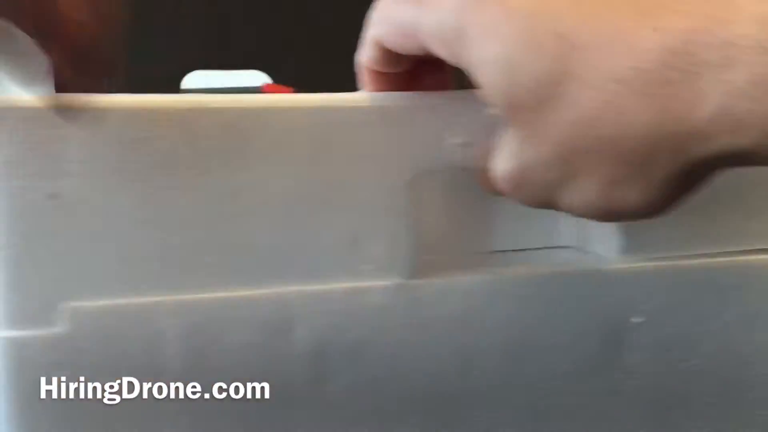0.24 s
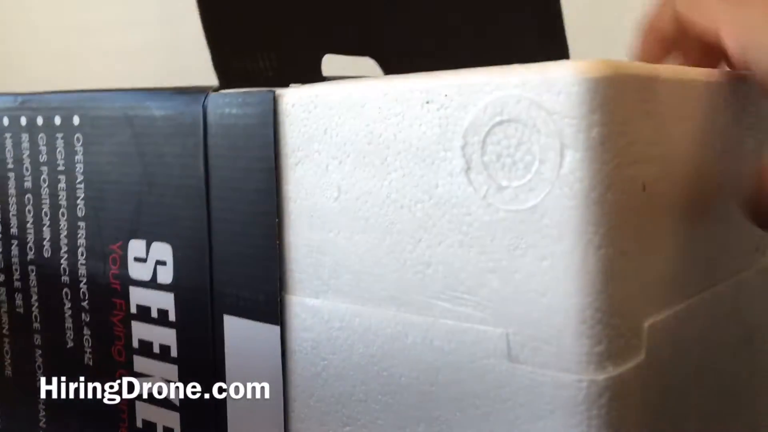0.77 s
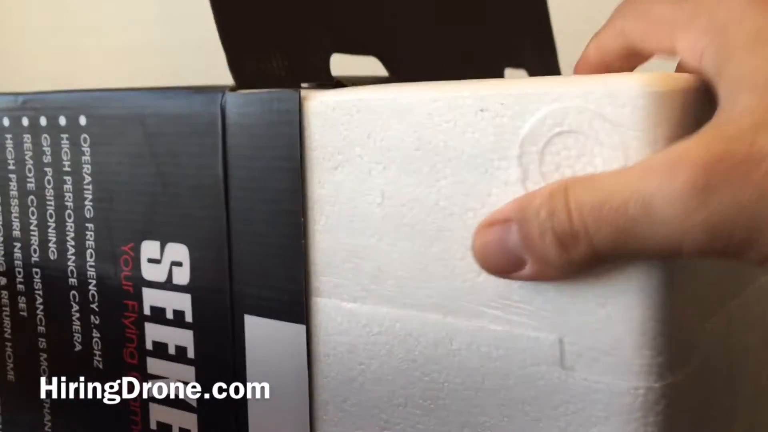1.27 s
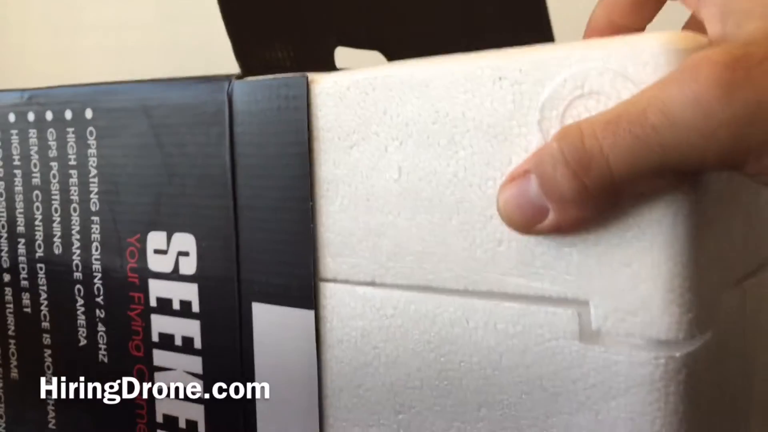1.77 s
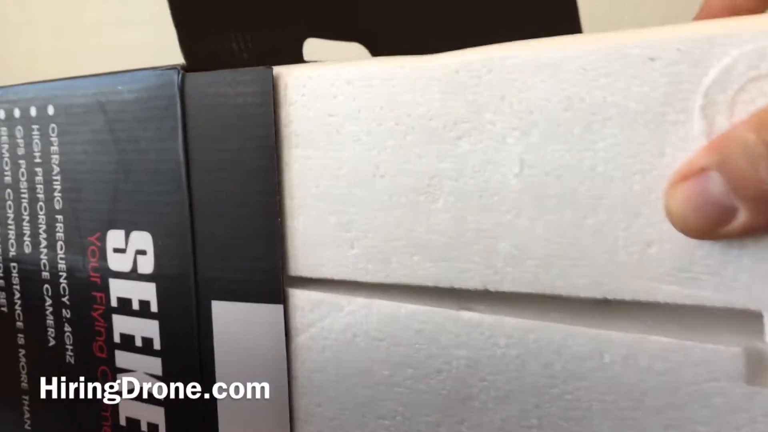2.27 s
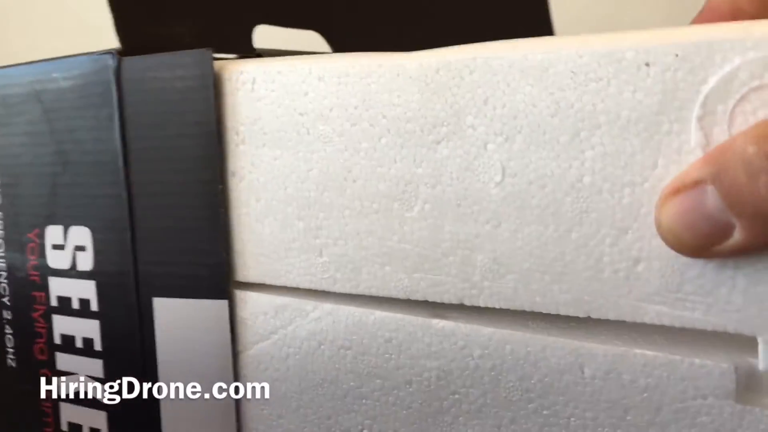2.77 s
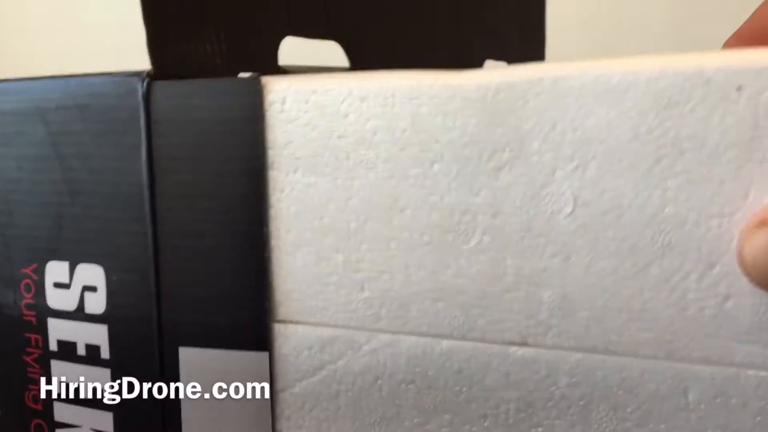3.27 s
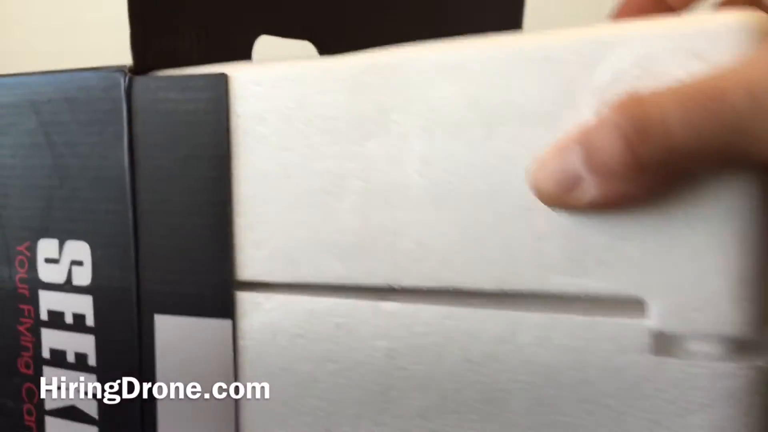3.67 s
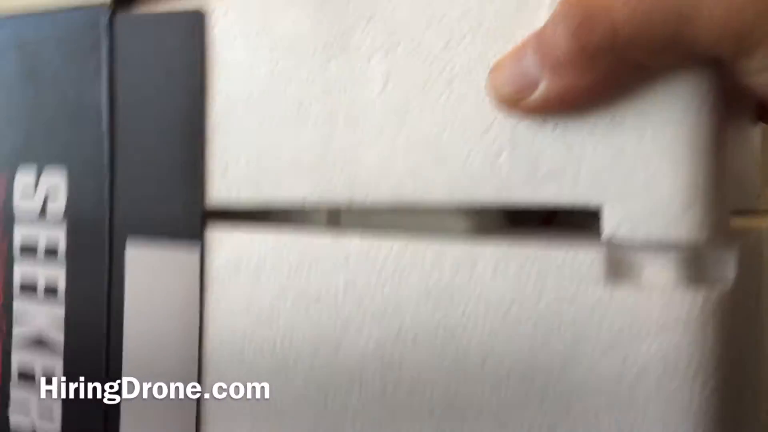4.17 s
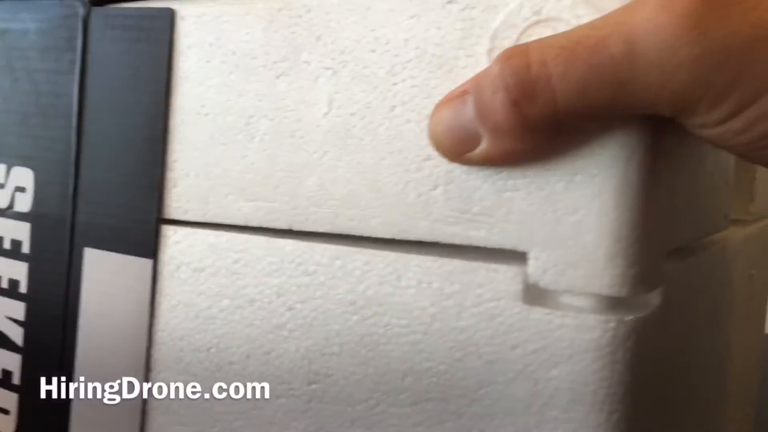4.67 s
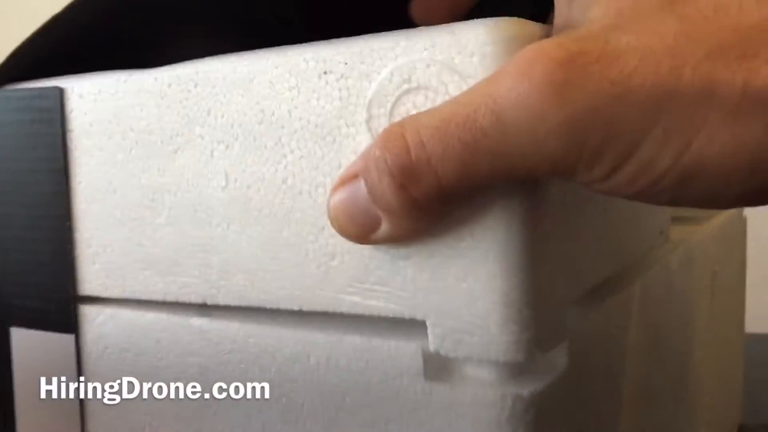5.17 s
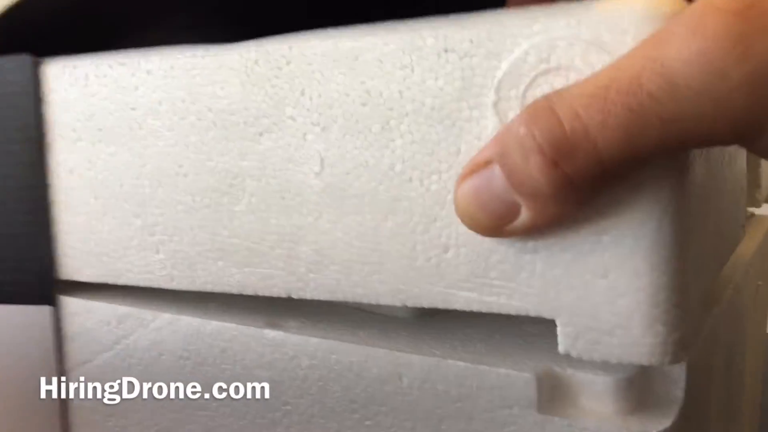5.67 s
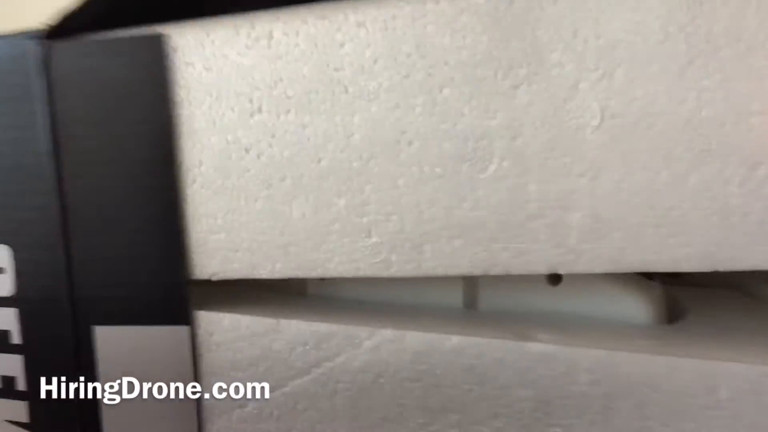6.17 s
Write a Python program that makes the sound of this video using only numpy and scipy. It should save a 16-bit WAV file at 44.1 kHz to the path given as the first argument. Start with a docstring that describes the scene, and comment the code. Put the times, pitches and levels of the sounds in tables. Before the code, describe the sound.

Close foam rasps and hisses against card in short jerky drags, with brief squeaks, bright ticks and dull box thumps growing stronger at the end.

```python
"""A small room, one microphone close to a cardboard box as a polystyrene insert is worked out in uneven pulls.
Foam beads slip over the card: dense random trains of slips make the hiss and rasp, and others shake the panels.
The foam catches in rough noise bursts, squeaks in gliding tones and ticks in short rings.
The block knocks on the hollow box: juddering pushes excite the modes and flexing of the card."""
import sys
import numpy as np
from scipy import signal
from scipy.fft import rfft, irfft
from scipy.io import wavfile

SR = 44100
rng = np.random.default_rng(int(sys.argv[2]) if len(sys.argv) > 2 else 0)


def unload_wav(signal):
    """Save mono or channel-first audio to the path in sys.argv[1] as 16-bit WAV at rate SR, clipped to [-1, 1]."""
    wavfile.write(
        sys.argv[1],
        SR,
        np.round(np.clip(np.atleast_2d(signal).T, -1, 1) * 32767).astype(np.int16),
    )


N = 283562
TIME = np.arange(N) / SR  # seconds


def undb(db):
    """Decibels to amplitude gain."""
    return 10 ** (np.asarray(db) / 20)


def unit(x):
    """Scale to rms 1."""
    return x / np.sqrt(np.mean(x ** 2) + 1e-18)


def add(out, s, x):
    """Mix x into out from s seconds."""
    i = max(int(s * SR), 0)
    out[i:i + len(x)] += x[:max(N - i, 0)]


def curves(rows):
    """Each column of a table joined by straight lines in time."""
    s, *columns = np.transpose(rows)
    return [np.interp(TIME, s, c) for c in columns]


def walk(rate, size=N):
    """Chance wandering with spread near 1: random points, rate per second, joined by straight lines."""
    steps = np.arange(size) * rate / SR
    points = rng.standard_normal(size // 4)
    return 1.2 * np.interp(steps, np.arange(size // 4), points)


def colour(x, points, order=8192):
    """Causal minimum-phase filter with the given (Hz, dB) outline, made by folding its cepstrum."""
    hz, db = np.transpose(points)
    grid = np.maximum(np.arange(order // 2 + 1) * SR / order, 1)
    outline_db = np.interp(np.log(grid), np.log(hz), db)
    cepstrum = irfft(np.log(undb(outline_db)))
    cepstrum[1:order // 2] *= 2
    cepstrum[order // 2 + 1:] = 0
    response = irfft(np.exp(rfft(cepstrum)))
    return signal.fftconvolve(x, response)[:len(x)]


def resonate(x, hz, q):
    """One resonance, gain 1 at its centre; the centre and narrowness are limited for high pitches."""
    hz = min(hz, SR / 3)
    return signal.lfilter(*signal.iirpeak(hz, max(q, 3 * hz / SR), fs=SR), x)


def slips(rate, spread_db):
    """A random train of tiny slips of very unequal size, rate per second on average."""
    happens = rng.random(N) < rate / SR
    size_db = spread_db * np.minimum(rng.exponential(size=N), 5)
    return unit(happens * rng.standard_normal(N) * undb(size_db))


def sing(x, share=2.66, q=20, life=0.03, count=420):
    """Patches of foam ring for life seconds, each at a pitch of its own, as the contact wanders."""
    out, swell = x.copy(), np.hanning(int(life * SR))
    for when, pitch, size in rng.random((count, 3)):
        s = when * (N - len(swell)) / SR
        patch_hz = 2200 * 6.4 ** pitch
        patch = resonate(x[int(s * SR):][:len(swell)], patch_hz, q)
        add(out, s, share * size * patch * swell)
    return unit(out)


def friction():
    """Hiss and rasp levels in dB: both follow each pull's sliding speed, and a quieter slide jerks more."""
    # The pulls of the hand. Each row: start in seconds, rise to full speed in seconds, steady slide in
    # seconds, time constant of the stall in seconds, then bead hiss and coarse rasp at full speed,
    # both in dB before jerks and trims.
    pulls = [(0, 0.004, 0.014, 0.19, -39, -39), (0.266, 0.094, .32, .035, -36.5, -48.5),
             (0.749, 0.02, 0.041, 0.036, -42.5, -49), (1.05, .008, 0.072, 0.032, -37, -42.5),
             (1.16, 0.043, 0.024, 0.1, -32.5, -40), (1.29, .13, 0.024, 0.035, -32, -38),
             (1.514, 0.096, 0.012, 0.085, -36, -38.5), (1.75, 0.045, 0.061, 0.029, -38.5, -49),
             (1.925, 0.022, 0.034, 0.035, -34, -38), (1.95, 0.08, 0.053, 0.11, -20.5, -35.5),
             (2.1, 0.15, .08, .14, -34, -36.5), (2.48, 0.018, .006, 0.0069, -37, -38.5),
             (2.525, 0.036, 0.04, 0.1, -46, -46.5), (2.693, 0.023, 0.083, 0.019, -35.5, -35.5),
             (2.841, 0.067, 0.042, 0.03, -25.5, -34.5), (2.99, 0.17, .008, 0.034, -32, -32),
             (3.34, .025, 0.098, 0.034, -61, -53), (3.449, 0.039, 0.037, .018, -35, -38),
             (3.535, 0.051, 0.13, 0.04, -32, -36.5), (3.82, 0.059, 0.016, 0.021, -39, -42),
             (3.975, 0.018, 0.022, 0.052, -55, -53), (4.114, .125, .006, 0.041, -36.5, -37.5),
             (4.27, .04, .03, 0.027, -41, -46.5), (4.345, 0.057, 0.006, 0.025, -28.5, -38.5),
             (4.455, 0.046, .004, 0.011, -32, -37.5), (4.52, 0.052, .006, 0.023, -31, -39.5),
             (4.6, .02, 0.061, 0.037, -44, -45.5), (4.779, 0.0063, 0.052, 0.037, -40, -48),
             (4.92, 0.12, .07, 0.033, -39, -48), (5.128, 0.026, 0.015, 0.067, -27.5, -38.5),
             (5.23, 0.11, .018, .045, -28.5, -38.5), (5.375, 0.063, .18, .065, -25, -33),
             (5.655, 0.052, 0.016, 0.072, -24.5, -35), (5.755, 0.08, 0.069, 0.017, -24, -31.5),
             (5.942, 0.039, 0.045, .018, -20.5, -30.5), (6.053, 0.019, .01, 0.024, -24.5, -26),
             (6.12, 0.052, 0.054, 0.033, -25, -32), (6.354, 0.1, .01, .03, -23, -33)]
    rise_power = 0.96  # 1 is a steady acceleration
    rasp_power = 0.65  # hiss grows in step with the speed, rasp with this power of it
    creep_hiss_db, creep_rasp_db = -57.5, -66  # the gripped foam never lies quite still
    jerk_depth_db, jerk_hz = 2.15, 55.3
    jerky_below_db, smooth_above_db = -47.5, -28  # hiss levels
    hiss_power, rasp_power_sum = undb(creep_hiss_db) ** 2, undb(creep_rasp_db) ** 2
    for start, rise, slide, stall, hiss_db, rasp_db in pulls:
        t = TIME - start
        speeding_up = np.clip(t / rise, 0, 1) ** rise_power
        stalling = np.exp(-np.clip((t - rise - slide) / stall, 0, 20))
        speed = speeding_up * stalling
        hiss_power = hiss_power + (undb(hiss_db) * speed) ** 2
        rasp_power_sum = rasp_power_sum + (undb(rasp_db) * speed ** rasp_power) ** 2
    hiss_db, rasp_db = 10 * np.log10(hiss_power), 10 * np.log10(rasp_power_sum)
    jerkiness = np.interp(hiss_db, [jerky_below_db, smooth_above_db], [1, 0])
    jerk_db = jerk_depth_db * jerkiness * walk(jerk_hz)
    return hiss_db + jerk_db, rasp_db + jerk_db


def scrape(hiss_db, rasp_db):
    """Beads slip over the card; the grip flutters and moves the fine hiss and the coarse rasp together."""
    # Colours of the fine hiss and the coarse rasp. Each row: frequency in Hz, relative level in dB.
    hiss_outline = [(1500, -45.5), (3000, -6.5), (4300, -13.5), (4900, -6), (6500, -5.5), (8500, -4),
                    (10700, -0.5), (13000, 0.5), (15500, -2.5)]
    rasp_outline = [(500, -2.5), (1100, 2), (1700, 0.5), (2300, 2.5), (3300, 0), (3900, -3), (5500, -1),
                    (7000, -2), (9500, -7.5), (15000, -20.5)]
    grip_db = 0.53 * walk(45) + 0.23 * walk(420)
    hiss = unit(colour(sing(slips(rate=26000, spread_db=-0.5)), hiss_outline))
    rasp = unit(colour(sing(slips(rate=8000, spread_db=-1.3)), rasp_outline))
    # a stronger pull makes shorter slips, so the top grows faster than the rest
    top = signal.sosfilt(signal.butter(1, 11000, "high", fs=SR, output="sos"), hiss)
    tilt_db = 0.11 * (hiss_db + 30)
    hiss = (hiss - top) * undb(-tilt_db) + top * undb(tilt_db)
    return undb(grip_db) * (undb(hiss_db + 1.05) * hiss + undb(rasp_db - 0.27) * rasp)


def crackle(hiss_db, rate=130, db=-13, hz=5200, spread_db=5.5):
    """Among the slips whole beads snag and let go with a sharper snap; the level follows the hiss."""
    t = np.arange(SR // 200) / SR  # 5 ms
    snap = rng.standard_normal(len(t)) * np.exp(-t / 0.003)
    snaps = signal.fftconvolve(slips(rate, spread_db), snap)[:N]
    return undb(hiss_db + db) * unit(resonate(snaps, hz, 0.3))


def box_response(flex_t60=0.054, flex_db=-4, slap_db=-6, size=16384):
    """A blow on the box: direct slap, a few clear modes and dense, quickly damped flexing of the card."""
    # Modes of the box with the foam in it. Each row: frequency in Hz, relative level in dB,
    # time to fall by 60 dB in seconds.
    box_modes = [(82.3, -4, 0.077), (129, -15, 0.19), (150, -4.5, 0.055), (188, -5.5, 0.17),
                 (240, -3.5, 0.18), (303.6, -2.5, 0.12), (357, -17, 0.21), (483.5, 9, 0.043),
                 (599, -2.5, 0.097), (639.6, -4.5, 0.15), (803, -8.5, 0.2), (924, 3, 0.081),
                 (1280, -8, 0.019), (1450, 1, 0.017), (2160, -5.5, 0.041), (2140, -8, 0.012)]
    # Colour of the slap and the flexing card. Each row: frequency in Hz, relative level in dB.
    flex_outline = [(25, 7.5), (75, -4.5), (200, 3), (400, 7), (650, 1.5), (1000, 5.5), (1500, -9.5),
                    (3000, -8), (8000, -29), (15000, -58)]
    t = np.arange(size) / SR
    slap = colour(1. * (t == 0), flex_outline)
    modes = np.zeros(size)
    for k, (hz, db, t60) in enumerate(box_modes):
        sign = (-1) ** k
        modes += sign * undb(db - 60 * t / t60) * np.sin(2 * np.pi * hz * t)
    flex = colour(rng.standard_normal(size) * undb(-60 * t / flex_t60), flex_outline)
    ring = undb(slap_db) * unit(slap) + unit(modes) + undb(flex_db) * unit(flex)
    return ring / np.sqrt(np.sum(ring ** 2))  # unit energy


def panels(box, rasp_db):
    """The dragging shakes the card panels and the hollow of the box, both growing with the rasp."""
    # How the box takes up the sliding. Each row: time in seconds, panel level and hollow rumble level,
    # both in dB at a moderate rasp, before a trim.
    shake = [(0, -49, -65), (.2, -43.5, -65), (.55, -41, -51), (.72, -45, -62), (1, -48, -60.5),
             (1.28, -40.5, -56), (1.8, -42, -58), (2.3, -45, -58), (2.65, -44, -46), (2.9, -44.5, -52),
             (3.42, -48.5, -50.5), (3.7, -41, -57), (4.05, -47.5, -53.5), (4.45, -43, -48.5),
             (4.7, -39.5, -52), (4.9, -38.5, -42), (5.3, -44, -47), (6.43, -43, -47.5)]
    # Colours of panels and rumble. Each row: frequency in Hz, relative level in dB.
    panel_outline = [(130, -27), (260, 1.5), (380, -2), (500, 3), (680, 4.5), (950, 1), (1250, -6),
                     (2000, -19.5), (5000, -37)]
    rumble_outline = [(25, -4.5), (50, -21), (80, -1), (125, -2), (190, 0.5), (260, -1), (400, -12),
                      (900, -35)]
    moderate_rasp_db = -40
    panel_growth, rumble_growth = 0.59, 0.13  # dB per dB of rasp
    panel_db, rumble_db = curves(shake)
    drive_db = rasp_db - moderate_rasp_db
    drag = slips(rate=3000, spread_db=-1.5)
    ring = signal.fftconvolve(rng.standard_normal(N), box)[:N]
    drone = unit(colour(drag + 0.014 * ring, panel_outline))
    rumble = unit(colour(slips(rate=970, spread_db=3.5), rumble_outline))
    drone_gain = undb(panel_db + panel_growth * drive_db + 0.6)
    rumble_gain = undb(rumble_db + rumble_growth * drive_db + 0.8)
    return drone * drone_gain + rumble * rumble_gain


def quiet_air():
    """The quiet air of the room: steady coloured noise."""
    # Colour of the air. Each row: frequency in Hz, relative level in dB.
    air_outline = [(25, 13), (60, 11.5), (200, 10), (600, 12), (1500, -6), (4000, -20), (8000, -66),
                   (12000, -4), (15500, -9)]
    return undb(-54.0) * unit(colour(rng.standard_normal(N), air_outline))


def squeaks(overtone_db=-8, uneven=0.32, flutter_db=3, size=8192):
    """Stick-slip squeaks and low creaks: slips lock into a gliding, scattering cycle, strong and weak in turn."""
    # Each row: start in seconds, length in seconds, start and end pitch in Hz,
    # level in dB before flutter and fades, pitch scatter as a share of the pitch.
    squeak_rows = [(.002, 0.052, 1555, 1410, -37, 0.14), (.05, .015, 1350, 1290, -33, .03),
                   (0.438, 0.046, 330, 279, -44, .06), (0.543, 0.024, 910, 1086, -39.5, .1),
                   (0.559, 0.033, 1357, 1200, -40, 0.026), (1.27, 0.039, 409, 353, -38, 0.066),
                   (1.558, 0.019, 3240, 3480, -30, 0.05), (3.212, 0.087, 565, 261, -46.5, 0.052),
                   (3.404, 0.11, 269, 659, -46, 0.071), (3.508, 0.035, 584, 645, -40.5, 0.033),
                   (3.63, 0.046, 502, 556, -42, .04), (3.719, 0.086, 464, 227, -46, 0.076),
                   (3.914, .012, 2690, 3100, -42, 0.045), (3.916, 0.0069, 5280, 6040, -31, 0.018),
                   (4.571, 0.011, 8500, 9300, -25, 0.047), (5.713, 0.03, 5200, 8860, -26, 0.045),
                   (5.707, 0.06, 14000, 11930, -24.5, 0.064), (6.311, 0.021, 3370, 3440, -38, 0.106),
                   (6.399, 0.014, 6900, 6460, -37, 0.046), (6.412, 0.025, 5750, 5400, -27, 0.036)]
    out = np.zeros(N)
    for s, length, start_hz, end_hz, db, scatter in squeak_rows:
        u = np.minimum(np.arange(size) / SR / length, 1)
        glide_hz = start_hz + (end_hz - start_hz) * u
        hz = glide_hz * (1 + scatter * walk(min(start_hz / 4, 4000), size))
        phase = 2 * np.pi * np.cumsum(hz) / SR
        # the 3/2 partial makes every second slip differ
        partials = [(1, 1), (3 / 2, uneven * undb(overtone_db / 2)),
                    (2, undb(overtone_db)), (3, undb(2 * overtone_db))]
        tone = sum(gain * np.sin(k * phase) * (k * hz < SR / 2) for k, gain in partials)
        flutter = undb(db + flutter_db * walk(428, size))
        swell = np.abs(np.sin(np.pi * u)) ** 0.5
        add(out, s, flutter * unit(tone) * swell)
    return out


def catches(q=1.7):
    """Foam tears free or is brushed by the hand: a patch of beads in a rough burst, quick to start, dying away."""
    # Each row: start in seconds, length in seconds, level in dB before the swell, centre in Hz.
    catch_rows = [(.005, 0.18, -39.5, 6100), (0.347, 0.46, -42, 5800), (0.352, .04, -45, 4200),
                  (1.18, 0.057, -36, 7500), (2.98, 0.011, -47, 8000), (3.169, 0.027, -31, 9000),
                  (5.115, 0.0074, -32, 10000), (0.807, 0.0089, -37.5, 4700), (1.069, 0.03, -29.5, 9900),
                  (1.093, 0.013, -29, 11000), (1.125, 0.03, -33, 8700), (1.55, 0.044, -28.5, 6540),
                  (1.589, 0.032, -32.5, 5740), (2.705, 0.016, -31, 5100), (3.846, 0.011, -45, 3780),
                  (3.002, 0.036, -26.5, 9600), (4.2, 0.012, -28, 10500), (4.227, .022, -31.5, 8950),
                  (4.388, 0.015, -45, 9000), (3.913, 0.015, -33, 10000), (4.496, 0.014, -32.5, 9150),
                  (4.572, 0.022, -24, 9700), (4.672, 0.008, -36, 8500), (5.979, 0.055, -18.5, 13300),
                  (6.069, 0.015, -19, 11300), (6.143, 0.011, -25.5, 9000), (6.31, .012, -41, 4000)]
    out, beads = np.zeros(N), sing(slips(rate=20000, spread_db=1.0), share=1.1)
    for s, length, db, hz in catch_rows:
        u = np.linspace(0, 1, int(length * SR))
        burst = unit(resonate(beads[int(s * SR):][:len(u)], hz, q))
        swell = np.sqrt(np.abs(np.sin(np.pi * u ** 0.48)))
        add(out, s, undb(db) * burst * swell)
    return out


def knocks(judder=0.23, size=8192):
    """The block knocks the box: a push and a judder of smaller contacts, with shares of thud, panel and crack."""
    # Each row: start in seconds, centre of the thud in Hz, nominal levels of thud, panel and crack in dB,
    # time constant of the judder in seconds.
    knock_rows = [(.008, 220, -52, -38.5, -44, 0.039), (.256, 200, -53, -40, -45.5, 0.019),
                  (.36, 220, -54, -44, -44, 0.023), (.52, 190, -49.5, -44, -64.5, 0.013),
                  (1.067, 76, -40, -44, -74, 0.026), (1.268, 240, -46, -37, -59, 0.015),
                  (1.6, 168, -42, -52, -63, 0.015), (2.064, 112, -30, -43, -57, 0.01),
                  (2.126, 130, -37, -38.5, -53, 0.0087), (2.27, 150, -45, -37.5, -48, 0.011),
                  (2.696, 171, -38.5, -39.5, -41, 0.022), (2.712, 170, -36, -38, -30.5, 0.016),
                  (2.979, 190, -35, -33, -39.5, 0.05), (3.008, 135, -30, -34, -32, 0.011),
                  (3.027, 206, -21.5, -46, -29.5, 0.0098), (3.04, 210, -33, -29.5, -30.5, 0.012),
                  (3.08, 120, -37, -38, -31.5, 0.024), (3.36, 200, -52, -52, -60, 0.011),
                  (3.402, 232, -44, -43, -39, 0.01), (3.563, 99, -41, -52, -46, 0.0095),
                  (3.847, 102, -40, -44.5, -39.5, 0.0073), (4.196, 180, -38.5, -44.5, -48, 0.0079),
                  (4.374, 70.4, -39, -34.5, -41, 0.0035), (4.404, 172, -33, -41, -34, 0.0057),
                  (4.524, 180, -48, -37.5, -45, 0.011), (4.611, 200, -55, -42, -36.5, 0.016),
                  (4.7791, 172, -27, -21, -33, 0.0003), (4.793, 182, -24, -34, -45, 0.0023),
                  (4.833, 200, -33, -44, -53, 0.0047), (4.909, 150, -33.5, -37, -52, 0.01),
                  (4.982, 190, -33, -36.5, -46, 0.01), (5.059, 182, -42, -38.5, -42, 0.013),
                  (5.257, 150, -42, -55, -54, 0.0033), (5.658, 130, -37, -36.5, -44, .008),
                  (5.836, 205, -39, -39, -53, 0.0064), (6.068, 105, -19.5, -24.5, -47, 0.0029),
                  (6.08, 195, -22.5, -21, -23, 0.018), (6.091, 68, -36, -28, -23.5, 0.0035),
                  (6.125, 120, -30, -33.5, -40, 0.014), (6.337, 170, -35.5, -40, -37.5, 0.0084)]
    out, t = np.zeros(N), np.arange(size) / SR
    for s, thud_hz, *levels_db, length in knock_rows:
        force = judder * rng.standard_normal(size) * np.exp(-t / length)
        force[0] += 3.0  # the push
        blow = signal.fftconvolve(force, box_response())
        # set each band's gain from its strength in the first 20 ms of the blow
        onset = blow[:SR // 50]
        bands = [(thud_hz / 2, thud_hz * 1.5), (280, 1100), (1250, 3500)]  # Hz
        filters = [signal.butter(2, edges, "band", fs=SR, output="sos") for edges in bands]
        parts = [signal.sosfilt(sos, onset) for sos in filters]
        thud, panel, crack = np.array(levels_db) - 20 * np.log10(np.std(parts, axis=1))
        outline = [(thud_hz / 4, thud - 12), (thud_hz * 0.47, thud), (thud_hz * 1.16, thud),
                   (480, panel + 1), (1000, panel),
                   (1500, crack + 2), (2800, crack - 3), (12000, crack - 16)]
        add(out, s, colour(blow, outline))
    return out


def ticks(decay=0.001, q=0.64, size=1024):
    """A single bead or card edge snaps: a burst of noise through two broad resonances."""
    # Each row: start in seconds, peak level in dB, ring frequency in Hz.
    tick_rows = [(0.255, -18.5, 5540), (1.5688, -10.5, 5630), (1.8798, -15.5, 6350), (2.05, -23, 5000),
                 (2.65, -24.5, 4040), (3.362, -34, 3500), (3.403, -27.5, 4030), (3.989, -33, 8930),
                 (4.011, -26.5, 6800), (4.086, -36, 9050), (4.322, -23, 6000), (4.375, -19, 5800),
                 (4.524, -23, 9000), (4.547, -28, 9000), (4.576, -25, 8550), (4.672, -21, 9300),
                 (4.7951, -16.5, 6000), (4.948, -29, 7000), (4.985, -25, 3500), (6.371, -29.5, 7900)]
    out, t = np.zeros(N), np.arange(size) / SR
    for s, db, hz in tick_rows:
        burst = rng.standard_normal(size) * np.exp(-t / decay)
        snap = resonate(resonate(burst, hz, q), hz, q)
        add(out, s, undb(db) * snap / np.abs(snap).max())
    return out


def room(x, wet_db=-13, size=22050):
    """The walls of a small room return a faint tail of decaying noise bands, after a gap of 6 ms."""
    # Each row: centre of the band in Hz, time to fall by 60 dB in seconds.
    room_bands = [(125, 0.22), (500, 0.19), (2000, 1), (8000, 0.039)]
    t, tail = np.arange(size) / SR, 0
    for hz, t60 in room_bands:
        band = resonate(rng.standard_normal(size), hz, 1.0) * undb(-60 * t / t60)
        tail = tail + band / np.sqrt(t60 * SR / np.log(1e6))  # even out the energy of long and short bands
    return x + undb(wet_db) * signal.fftconvolve(x, tail * (t > .006))[:N]


def scene():
    """All the sounds of the foam and the box, in the room, over its quiet air, alike in both channels."""
    hiss_db, rasp_db = friction()
    sliding = scrape(hiss_db, rasp_db) + crackle(hiss_db) + panels(box_response(), rasp_db)
    handling = sliding + squeaks() + catches() + knocks() + ticks()
    return np.tile(room(handling) + quiet_air(), (2, 1))


def record(dry):
    """The microphone signal loses its top above 15750 Hz in a steep low-pass."""
    return signal.sosfilt(signal.ellip(10, .2, 80, 15750, fs=SR, output="sos"), dry)


dry = scene()
out = record(dry)
unload_wav(out)
```